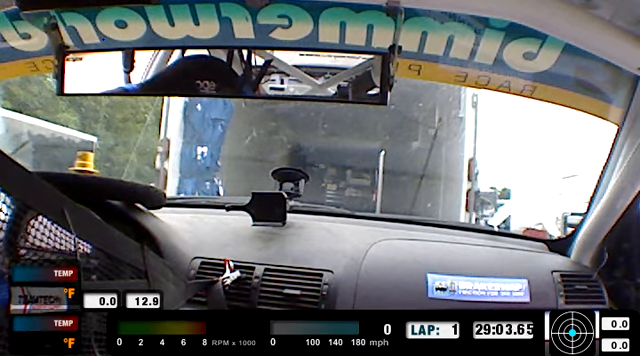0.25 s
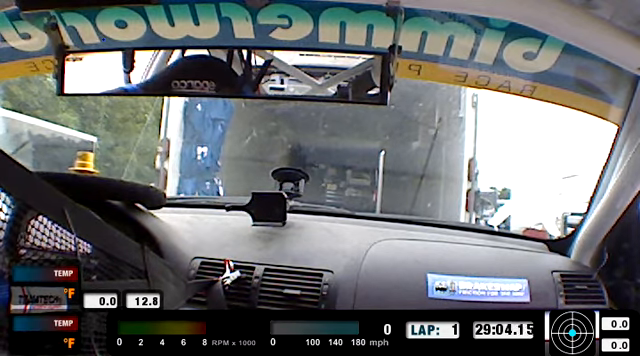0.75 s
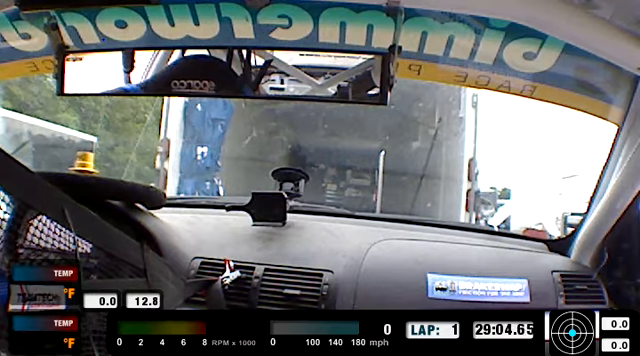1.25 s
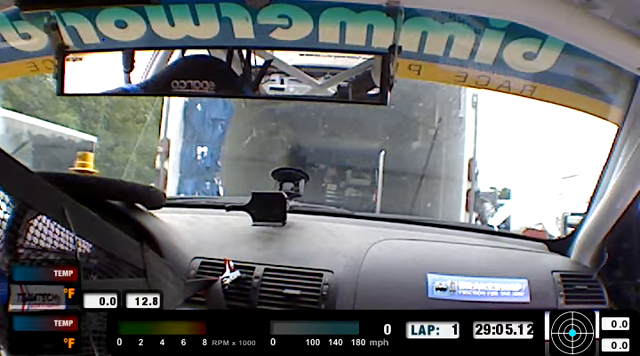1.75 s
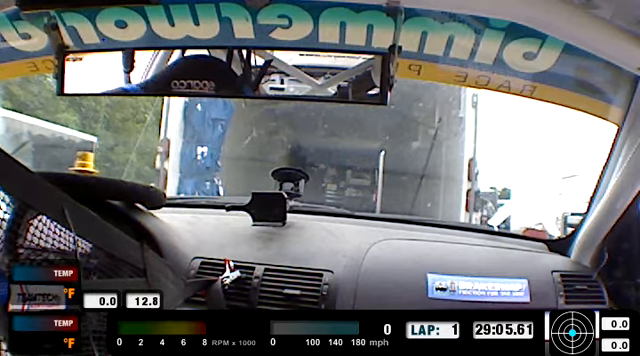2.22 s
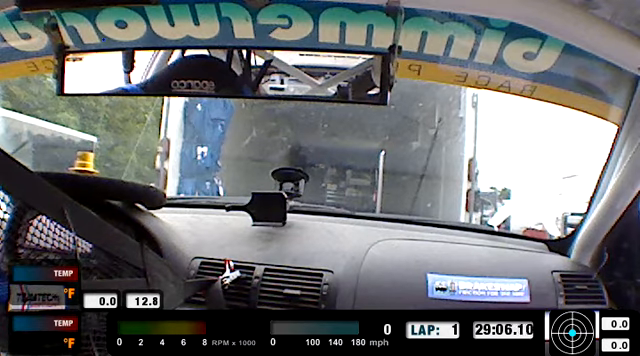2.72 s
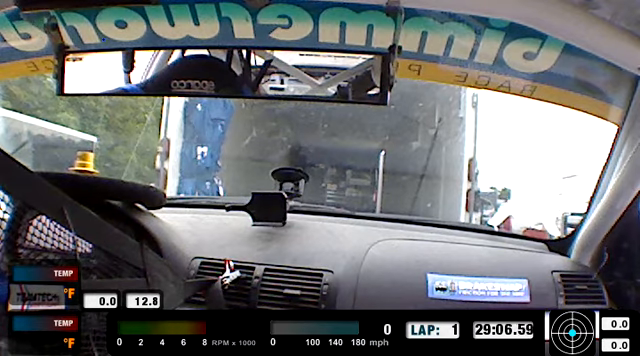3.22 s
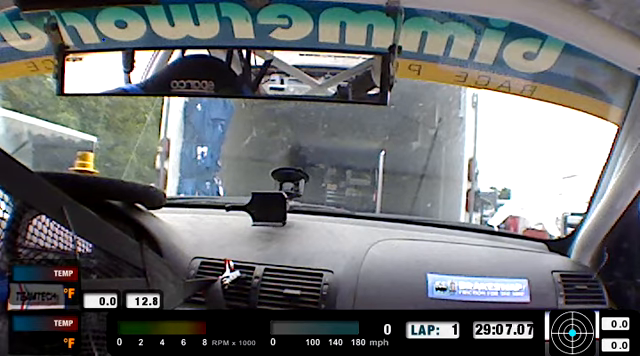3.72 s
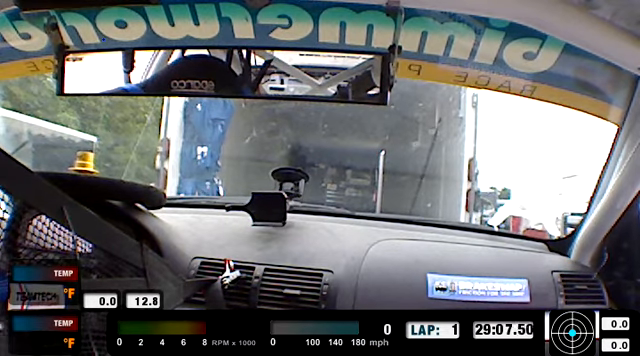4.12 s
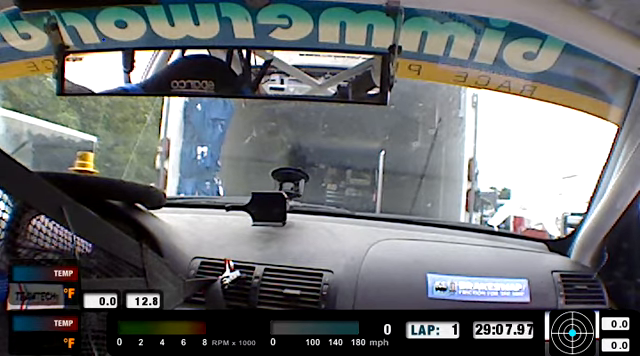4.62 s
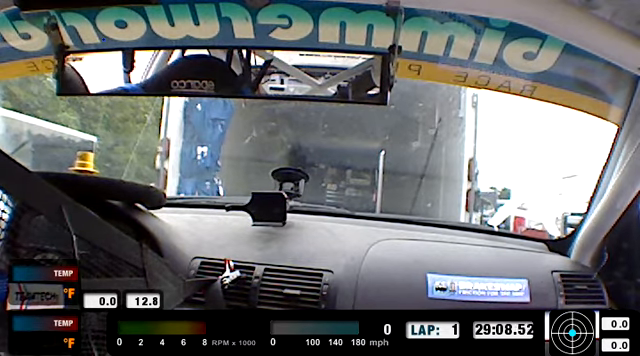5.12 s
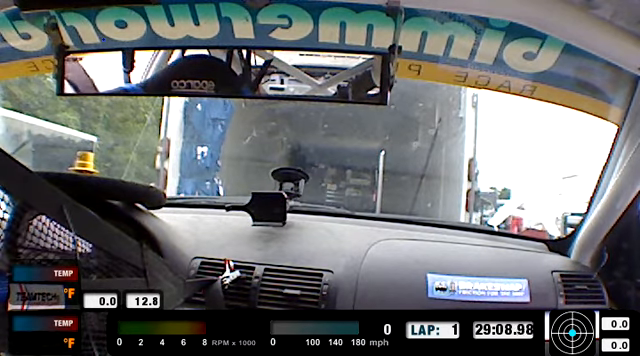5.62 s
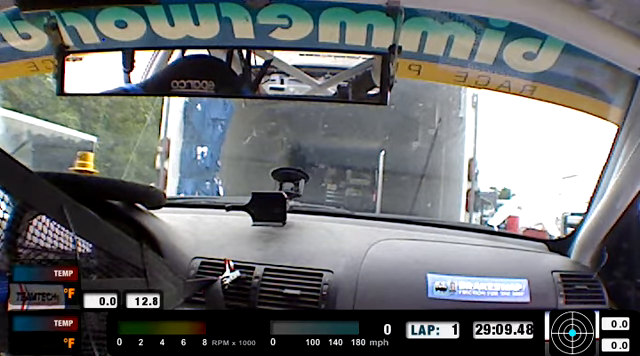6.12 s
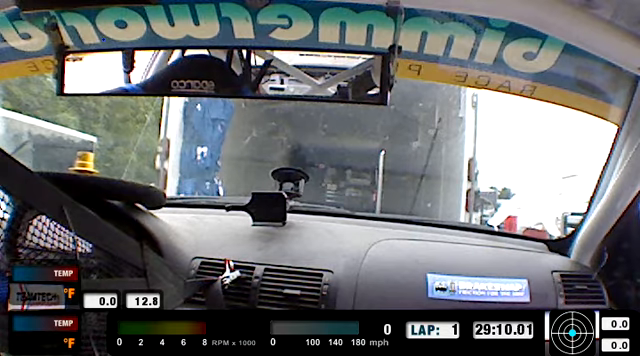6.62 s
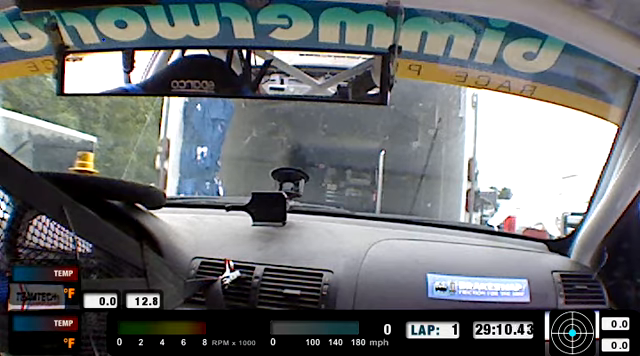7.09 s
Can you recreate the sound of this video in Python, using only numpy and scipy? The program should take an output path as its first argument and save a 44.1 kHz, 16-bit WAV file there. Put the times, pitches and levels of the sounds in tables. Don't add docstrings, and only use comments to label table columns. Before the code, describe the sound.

A driver shifts in the seat of a parked race car: small taps, rustling straps, a low creak and gentle body bumps. Distant engines swell through the shell over steady low rumble. A padded thump leads to a tight burst of hard buckle knocks and metal clinks, then scattered dull thuds and cloth movement that gradually quieten. The interior camera microphone adds soft hiss and a barely audible whine.

```python
import sys
import numpy as np
from scipy import signal
from scipy.fft import rfft, irfft, next_fast_len
from scipy.io import wavfile

SR = 44100
rng = np.random.default_rng(int(sys.argv[2]) if len(sys.argv) > 2 else 0)


def unload_wav(signal):
    wavfile.write(
        sys.argv[1],
        SR,
        np.round(np.clip(np.atleast_2d(signal).T, -1, 1) * 32767).astype(np.int16),
    )


def decibels_to_gain(level_db):
    exponent = np.asarray(level_db, float) / 20
    return 10 ** exponent


N = 324135

# f/Hz, level per Hz/dB
HISS_SPECTRUM = [(600, -12), (780, 2), (1500, 1), (2300, 0), (5000, 0), (6800, 1), (7500, -1), (8000, -11),
                 (8650, -16), (9100, -45)]
# f/Hz, width/Hz, level/dB
WHINE_TONES = [(2665, 12, -91), (5335, 20, -92), (6665, 30, -99)]
# t/s, level/dB
TRAFFIC_ROAR = [(0, -45), (.5, -49.5), (1.1, -48.5), (1.7, -51.5), (2.2, -49.5), (3, -49), (4, -52),
                (4.6, -49), (5.3, -53), (6.3, -54.5), (7.35, -50)]
# t/s, firing rate f/Hz, level/dB
EARLY_CAR = [
    (0.8, 100.2, -58.5),
    (1.2, 103, -55),
    (1.65, 105.7, -55),
    (1.888, 109.6, -45.5),
    (2.06, 112.4, -55.5),
    (2.18, 108.2, -55),
    (2.3, 112.3, -66),
]
# t/s, f/Hz, level/dB
HIGH_CAR = [
    (1.55, 262.5, -74),
    (1.65, 261.4, -63.5),
    (2.232, 296, -56),
    (2.29, 295.3, -69),
    (2.37, 294, -53),
    (2.43, 284, -70.5),
    (2.55, 275, -71.5),
]
# t/s, firing rate f/Hz, level/dB
LATE_CAR = [
    (3.8, 65.7, -67.5),
    (4.5, 68.8, -59.5),
    (4.83, 70.1, -64.5),
    (4.98, 70, -74.5),
    (5.25, 70.51, -63),
    (6.51, 73.4, -67),
    (6.62, 72, -70),
    (7.14, 72.9, -65),
    (7.35, 74, -55.5),
]
# t/s, f/Hz, level/dB
IDLING_CAR = [
    (1.5, 70, -66.5),
    (2.31, 77.6, -68),
    (2.44, 75.9, -52),
    (4.63, 76.2, -57.5),
    (4.8, 76.6, -67),
    (5.15, 73, -59),
    (5.9, 71.5, -57),
    (6.78, 72.5, -56),
    (7.35, 75, -60),
]
# multiple of the firing rate, level/dB
EARLY_PARTIALS = [(0.399, -25.5), (1, 5), (1.499, -23), (2, -18.5)]
LATE_PARTIALS = [(1, -9), (2, -20), (3, 5.5), (4, -23.5), (5, -10.5), (6, -11.5)]
# t/s, f/Hz, length/s, level/dB
WEIGHT_SHIFTS = [(0.0, 40, 0.034, -39.5), (0.248, 42, .08, -50), (0.325, 149, 0.058, -43),
                 (0.325, 253, 0.077, -47.5), (0.417, 39.6, 0.099, -47.5), (1.003, 41.8, .35, -45),
                 (1.826, 41, .08, -56), (2.336, 42, .12, -43.5), (2.338, 94.8, 0.099, -40.5),
                 (3.12, 165, 0.13, -47.5), (3.19, 216, 0.12, -52), (3.55, 188.6, 0.13, -54),
                 (0.5, 36, 0.04, -58), (.68, 36.6, 0.14, -48.5), (3.601, 280.6, 0.12, -47.5),
                 (5.696, 41.6, .1, -51.5), (6.096, 39, 0.22, -56), (6.864, 40, 0.15, -57),
                 (7.151, 42.6, 0.093, -50)]
# t/s, length/s, first f/Hz, last f/Hz, loudest level/dB
SEAT_CREAKS = [
    (0.985, .022, 515, 515, -56),
    (1.02, .14, 530, 548, -52),
    (0.85, .045, 995, 985, -70),
    (0.445, .068, 1170, 1190, -72),
    (3.712, .058, 1240, 1200, -60),
    (3.685, .11, 830, 805, -65),
]
# loudest t/s, rise/s, fall/s, level/dB, brightness/dB
CLOTH_RUSTLES = [(.21, 0.023, 0.046, -82.5, 4.5), (0.321, 0.091, 0.15, -66.5, -8),
                 (0.453, 0.032, 0.1, -68, -10), (0.555, 0.028, 0.21, -69, -4.5),
                 (0.664, 0.0058, 0.088, -63.5, -20), (0.915, 0.14, 0.16, -67.5, -2.5),
                 (1.28, 0.64, 0.051, -75, -10.5), (1.35, .015, 0.28, -75, 2.5), (1.5, .3, 0.041, -73, -5),
                 (3.26, .02, 0.015, -70.5, 4), (3.36, 0.056, 0.15, -77.5, -14),
                 (3.456, 0.03, 0.059, -57.5, -15), (3.629, 0.69, 0.39, -64.5, -5),
                 (3.95, 0.062, 0.22, -72, -19), (4.656, 0.027, 0.046, -75, 8), (4.775, 0.14, 0.2, -75, -13),
                 (5.142, 0.11, .17, -69.5, -2.5), (5.34, 0.011, 0.28, -72.5, -25),
                 (5.591, 0.068, 0.031, -77, 5), (5.948, 0.095, 0.15, -73.5, -5.5),
                 (6.044, .05, 0.18, -79, -16), (6.226, .04, 0.14, -73, -6.5),
                 (6.292, 0.11, 0.062, -78, -4.5)]
# t/s, level/dB
SEAT_WORK = [(0.15, -77.5), (0.55, -54.5), (0.94, -66), (1.11, -58.5), (1.45, -60.5), (1.78, -69.5),
             (2.75, -65), (2.95, -51), (3.45, -57.5), (3.64, -46.5), (3.9, -56), (4.13, -63.5), (4.95, -66),
             (5.2, -62.5), (6.05, -66.5), (6.18, -60.5), (6.6, -72.5), (7.35, -65.5)]
# f/Hz, width/Hz, level/dB
LOW_CLOTH = [(1094, 150, 3.5), (1240, 68, 5), (1644, 300, 1.5)]
HIGH_CLOTH = [(2043, 480, 0.5), (2563, 190, -3), (2948, 350, -2), (3227, 930, -8)]
# f/Hz, time to fall 60 dB/s
CABIN_MODES = [(312, 0.16), (345, .18), (371, 0.22), (395, 0.17), (447, 0.26), (495, 0.39), (520, 0.19),
               (553, 0.12)]
# t/s, level/dB, tongue over frame/dB
BUCKLE_CLINKS = [
    (2.898, -39.5, -3),
    (2.9801, -29.5, 16),
    (3.114, -52, -4),
    (3.1871, -41.5, 1),
    (3.544, -60, 8),
]
# f/Hz, level/dB, time to fall 60 dB/s
TONGUE_MODES = [(2330, -22, .14), (2450, 1, .085), (2995, -18, .15), (3962, -19, .15), (4820, -15, .08),
                (5114, -14, .065)]
FRAME_MODES = [(1642, -8, .12), (3128, -8, .1), (3637, -6, .27), (3690, -9, .22), (3790, -8, .18),
               (3975, -6, .17), (4192, -7, .16), (4420, -15, .1), (4900, -10, .1)]
# t/s, crack level/dB, boom f/Hz, boom level/dB, edge level/dB
TRIM_KNOCKS = [
    (0.204, -66, 540, -53.5, -78),
    (0.4303, -61, 401, -62.5, -71),
    (2.7512, -41, 432, -44.5, -49),
    (2.899, -36.5, 490, -50, -41.5),
    (2.9812, -38, 300, -45.5, -35),
    (3.1883, -39, 425, -46.5, -41.5),
    (3.3678, -57.5, 503, -64, -68),
    (3.8508, -70, 526, -72, -64),
    (4.4228, -72, 474, -57, -87),
    (7.2665, -64.5, 341, -71, -78),
]
# t/s, crack level/dB, boom f/Hz, boom level/dB, edge level/dB
SOFT_KNOCKS = [(0.2326, -77, 565, -60.5, -89), (0.328, -69, 572, -45, -79), (0.5328, -59, 440, -70, -59),
               (0.6565, -54.5, 445, -62, -70), (1.7846, -69, 272, -59, -71),
               (2.1017, -42.5, 440, -41.5, -53), (2.33, -67.5, 407, -57, -77),
               (2.8745, -59.5, 483, -70, -83), (3.114, -37.5, 412, -42.5, -39.5),
               (3.3099, -61.5, 334, -69, -57), (3.4353, -52.5, 595, -52.5, -82),
               (3.543, -64, 457, -70, -60), (3.7369, -60, 490, -54, -92), (3.7807, -60, 543, -53, -67),
               (3.8194, -61.5, 551, -54, -79), (3.904, -55, 455, -59, -82), (1.339, -73.5, 468, -60, -72),
               (4.1132, -77, 540, -57, -88), (4.349, -43, 363, -41.5, -84), (4.6504, -60, 311, -54.5, -65),
               (4.7629, -72, 497, -67, -79), (5.332, -65, 366, -69, -67), (5.547, -70, 469, -56, -74),
               (5.5912, -82, 473, -54.5, -73)]


def band(x, hz, width, order=2):
    edges = [max(hz - width / 2, 10), hz + width / 2]
    return signal.sosfilt(signal.butter(order, edges, "band", fs=SR, output="sos"), x)


def unit(x):
    return x / np.sqrt(np.mean(x ** 2, axis=-1, keepdims=True))


def walk(rate):
    steps = np.arange(N) * (rate / SR)
    count = int(steps[-1]) + 2
    return 1.2 * np.interp(steps, np.arange(count), rng.standard_normal(count))


def columns(table):
    s, *cols = np.transpose(table)
    t = np.arange(N) / SR
    fade_s = min(0.036 * (s[-1] - s[0]), .05)
    gate = np.clip(np.minimum(t - s[0], s[-1] - t) / fade_s, 0, 1)
    return [np.interp(t, s, c) for c in cols] + [gate]


def add(out, s, x):
    i = int(s * SR)
    out[i:i + len(x)] += x[:N - i]


def decay(t, t60):
    return decibels_to_gain(-60 * t / t60)


def ring(t, hz, t60, phase):
    return np.sin(2 * np.pi * (hz * t + phase)) * decay(t, t60)


def swell(s, rise_s, fall_s, span_db):
    t = np.arange(N) / SR - s
    return decibels_to_gain(span_db * np.maximum(np.minimum(t / rise_s, -t / fall_s), -4))


def grains(rate, spread_db):
    hits = rng.random(N) < rate / SR
    return hits * rng.standard_normal(N) * decibels_to_gain(spread_db * rng.exponential(size=N))


def drone(table, partials, wobble, flutter_db):
    hz, db, gate = columns(table)
    on, out = gate > 0, np.zeros(N)
    turns = np.cumsum((hz * (1 + wobble * walk(30)))[on]) / SR
    for multiple, partial_db in partials:
        level_db = db + 4.0 + partial_db + flutter_db * walk(6.6)
        out[on] += decibels_to_gain(level_db[on]) * np.sin(2 * np.pi * (multiple * turns + rng.random()))
    return gate * out


def electronics():
    hz, db = np.transpose(HISS_SPECTRUM)
    size = next_fast_len(N)
    f = np.arange(size // 2 + 1) * SR / size + 1
    shape = decibels_to_gain(np.interp(np.log(f), np.log(hz), db))
    hiss = irfft(rfft(rng.standard_normal(size)) * shape, size)[:N]
    out = decibels_to_gain(-77.3) * unit(hiss)
    noise = rng.standard_normal(N)
    for hz, width, db in WHINE_TONES:
        blur = unit(band(noise, hz, width, order=1))
        tone = 2 * np.sin(2 * np.pi * hz * np.arange(N) / SR)
        out += decibels_to_gain(db) * unit(blur + tone)
    return out


def traffic():
    level_db = columns(TRAFFIC_ROAR)[0]
    deep, panel, pan = (decibels_to_gain(level_db + db + 1.5 * walk(4.115)) for db in (-9.5, -4.5, -12.5))
    noise = rng.standard_normal((4, N))
    panels = unit(band(noise[1], 104.8, 35.)) + 0.49 * unit(band(noise[2], 79.5, 25.))
    roar = deep * unit(band(noise[0], 41., 14.0)) + panel * unit(panels)
    return roar + pan * unit(band(noise[3], 193.6, 130.0))


def engines():
    cars = drone(EARLY_CAR, EARLY_PARTIALS, wobble=0.022, flutter_db=3.0)
    cars += drone(HIGH_CAR, [(0.99, 0.0092)], wobble=0.0085, flutter_db=3.5)
    cars += drone(LATE_CAR, LATE_PARTIALS, wobble=0.0041, flutter_db=3.0)
    return cars + drone(IDLING_CAR, [(1, -4.5), (1.5, -15.5)], wobble=0.019, flutter_db=2.5)


def shifts():
    out, t = np.zeros(N), np.arange(SR) / SR
    for s, hz, length, db in WEIGHT_SHIFTS:
        phase = rng.random(2)
        push = (t / length) * np.exp(1 - 3.27 * t / length) * 3
        rock = np.sin(2 * np.pi * (hz * t + phase[0]))
        rock += 0.47 * np.sin(2 * np.pi * (1.2 * hz * t + phase[1]))
        add(out, s, decibels_to_gain(db) * push * rock)
    return out


def creaks():
    out = np.zeros(N)
    for s, length, hz0, hz1, db in SEAT_CREAKS:
        curve = [(s, hz0, db - 5), (s + .75 * length, hz1, db), (s + length, hz1, db - 3)]
        stutter = decibels_to_gain(3.0 * walk(55) - 1.5)
        out += stutter * drone(curve, [(1, 0), (2, -38)], wobble=.028, flutter_db=2.5)
    return out


def rustles():
    fibres = grains(9000., 2.2)
    low, high = (unit(sum(decibels_to_gain(db) * band(fibres, hz, w) for hz, w, db in part))
                 for part in (LOW_CLOTH, HIGH_CLOTH))
    fine = unit(band(fibres, 4040.0, 3500.0, order=3))
    low = low + decibels_to_gain(4.5) * unit(band(fibres, 556, 350., order=3))
    out = np.zeros(N)
    for s, rise, fall, db, bright_db in CLOTH_RUSTLES:
        mix = low + decibels_to_gain(2.5 + .35 * bright_db) * high + decibels_to_gain(bright_db) * fine
        out += decibels_to_gain(db) * swell(s, rise, fall, span_db=27.5) * mix
    return out * decibels_to_gain(0.75 * walk(40))


def seat_thuds():
    thumps = grains(1500., 0.99)
    seat = sum(band(thumps, hz, 97.0, order=1) for hz, _ in CABIN_MODES)
    seat = seat + 1.5 * band(thumps, 670.0, 45.0)
    return decibels_to_gain(columns(SEAT_WORK)[0] - 0.5) * unit(band(seat, 356.0, 366.0, order=5))


def clinks():
    out, t = np.zeros(N), np.arange(int(.4 * SR)) / SR
    onset = 1 - np.exp(-t / .002)
    for s, db, share_db in BUCKLE_CLINKS:
        for part, part_db in ((TONGUE_MODES, db), (FRAME_MODES, db - 4 - share_db)):
            for hz, mode_db, t60 in part:
                luck, phase = rng.standard_normal(2)
                level = decibels_to_gain(part_db + mode_db + 1.6 * np.tanh(luck))
                add(out, s, level * ring(t, hz, t60, phase) * onset)
    return out


def trim_rattle(noises, c):
    length = int(.06 * SR)
    t = np.arange(length) / SR
    trim = (rng.standard_normal(length) + 1.1 * c[:, :length]) * decay(t, 0.03)
    trim[:, 0] = 16.
    impacts = decibels_to_gain(1.8 * rng.exponential(size=c.shape)) * (rng.random(c.shape) < 6000. / SR)
    impacts[:, :40] = .9
    return [signal.fftconvolve(x * impacts + 0.034 * x, trim, axes=1)[:, :c.shape[1]] for x in noises]


def cabin_boom(t, hz, boom_db, thud):
    mode_hz, mode_t60 = np.transpose(CABIN_MODES)[:, :, None]
    near = 1 / (1 + ((mode_hz - hz) / 60.) ** 2)
    modes = near * ring(t, mode_hz, mode_t60, rng.random(mode_hz.shape))
    build_s = np.interp(boom_db, [-54, -46], [.0025, .009])
    boom_t60 = np.interp(boom_db, [-54, -46], [.12, 1.5])
    boom = (modes.sum(axis=0) / np.linalg.norm(near) + thud) * (1 - np.exp(-t / build_s))
    return boom * decay(t, boom_t60)


def knocks():
    out, t = np.zeros(N), np.arange(int(.3 * SR)) / SR
    rows = list(TRIM_KNOCKS) + list(SOFT_KNOCKS)
    a, b, c = np.moveaxis(rng.standard_normal((len(rows), 3, len(t))), 1, 0)
    a, b = trim_rattle((a, b), c)
    chatter = decibels_to_gain(1.7 * unit(band(c, 77.0, 67.0, order=1))) * (1 - np.exp(-t / 0.0012))
    broad = 0.59 * unit(band(a, 2250.0, 2770.0, order=8)) * decay(t, 0.19)
    broad += 0.4 * unit(band(b, 1200., 1200.0, order=2)) * decay(t, 0.2)
    edges = unit(band(b, 4250.0, 1700.0, order=4)) * decay(t, .17)
    edges += 0.27 * unit(band(b, 6320.0, 1800.0, order=3)) * decay(t, .15)
    edges *= 1 - np.exp(-t / 0.0083)
    thuds = 0.43 * unit(band(c, 382.0, 435.0, order=5)) * decay(t, 0.22)
    for k, (s, crack_db, hz, boom_db, edge_db) in enumerate(rows):
        padded = k >= len(TRIM_KNOCKS)
        crack_hz = 1360 if padded else 2440
        crack = broad[k] + 0.49 * unit(band(a[k], crack_hz, 0.37 * crack_hz)) * decay(t, 0.18)
        if padded:
            crack = 1.26 * band(crack, 1200, 2400, order=1)
        rattle = decibels_to_gain(crack_db - 3.0) * crack + decibels_to_gain(edge_db - 5.5) * edges[k]
        boom = decibels_to_gain(boom_db + 15.5) * cabin_boom(t, hz, boom_db, thuds[k])
        add(out, s - .001, chatter[k] * rattle + boom)
    return out


def scene():
    background = traffic() + engines() + shifts()
    driver = creaks() + rustles() + seat_thuds()
    return (background + driver + clinks() + knocks())[None]


def roll_off(x):
    return signal.sosfilt(signal.butter(12, 8820, fs=SR, output="sos"), x)


def record(dry):
    dull = signal.sosfilt(signal.cheby1(6, 1, 7600., fs=SR, output="sos"), dry)
    return roll_off(dull + electronics())


dry = scene()
out = record(dry)
unload_wav(out)
```